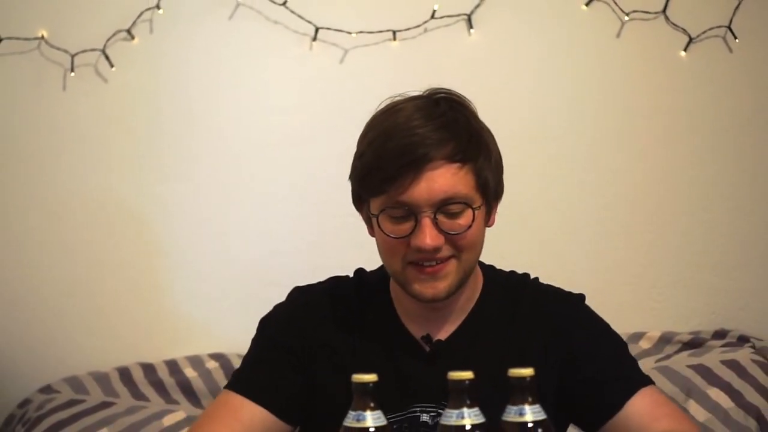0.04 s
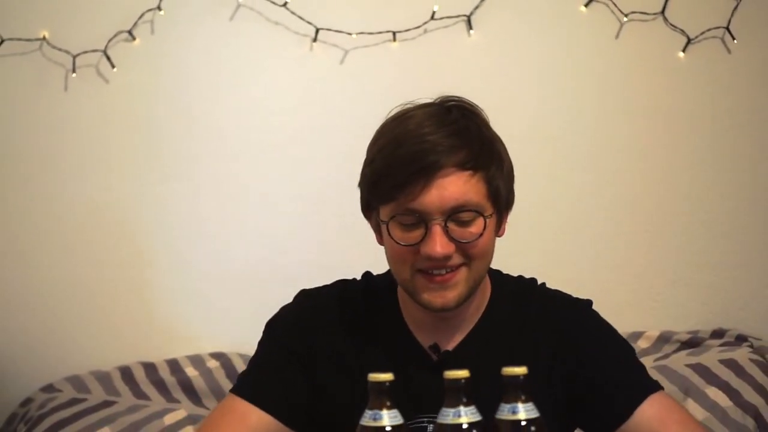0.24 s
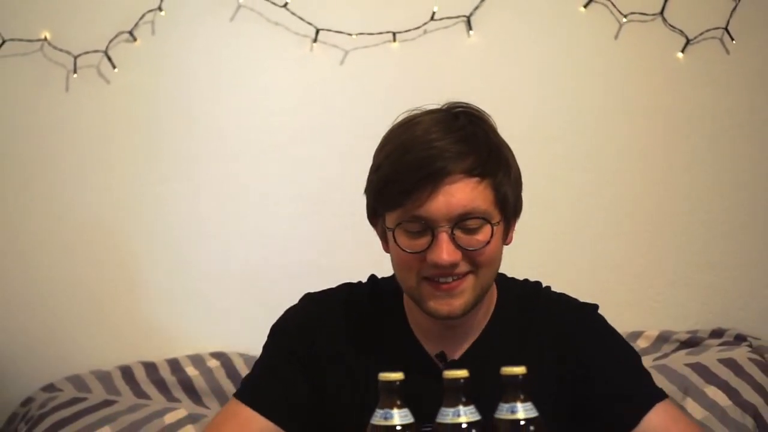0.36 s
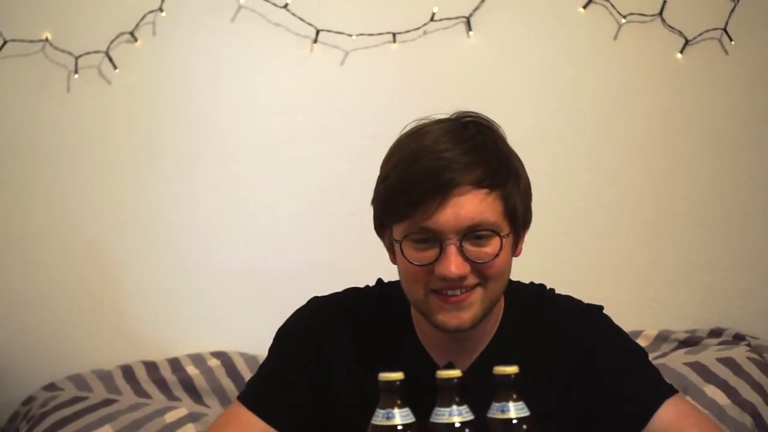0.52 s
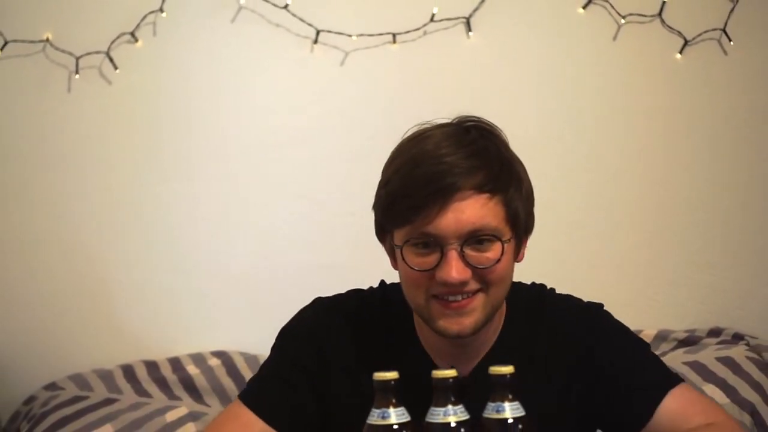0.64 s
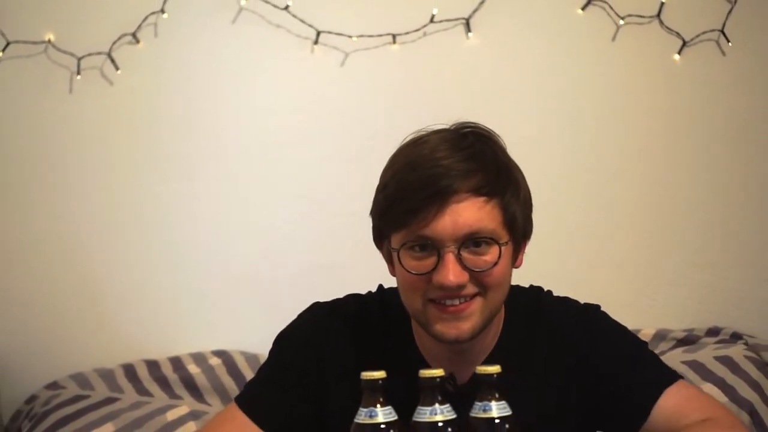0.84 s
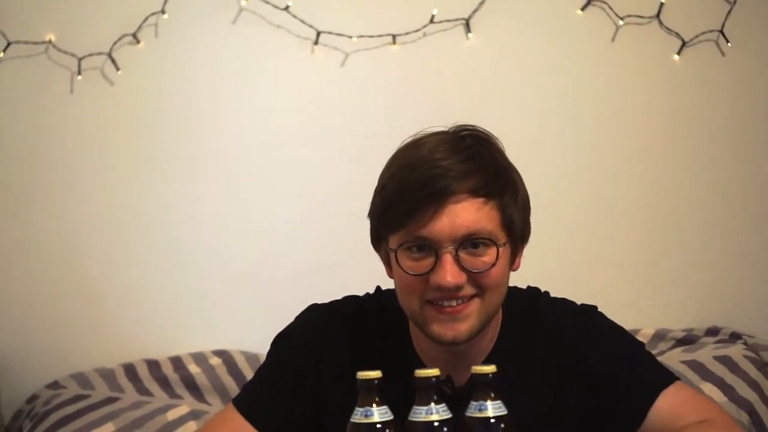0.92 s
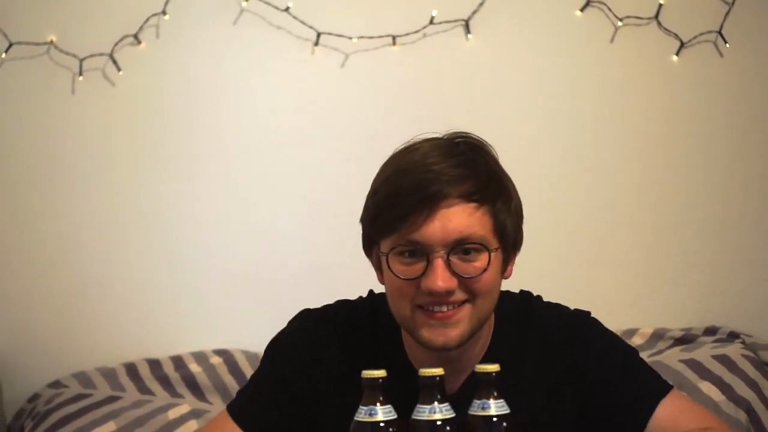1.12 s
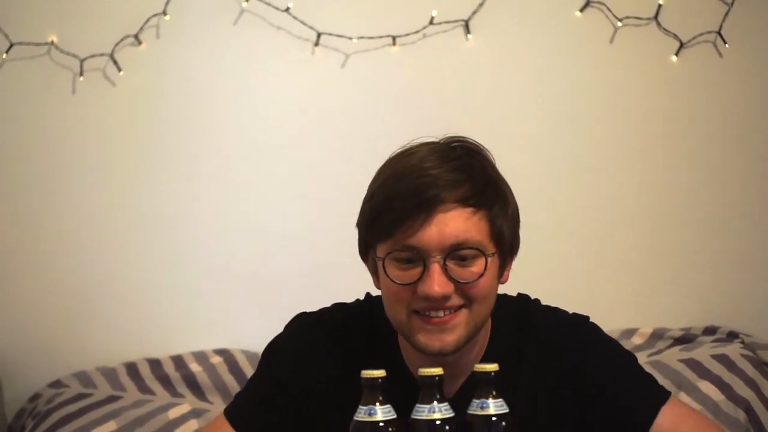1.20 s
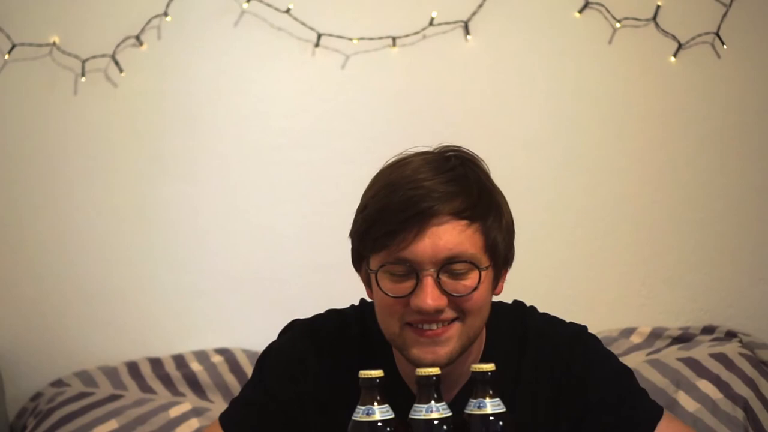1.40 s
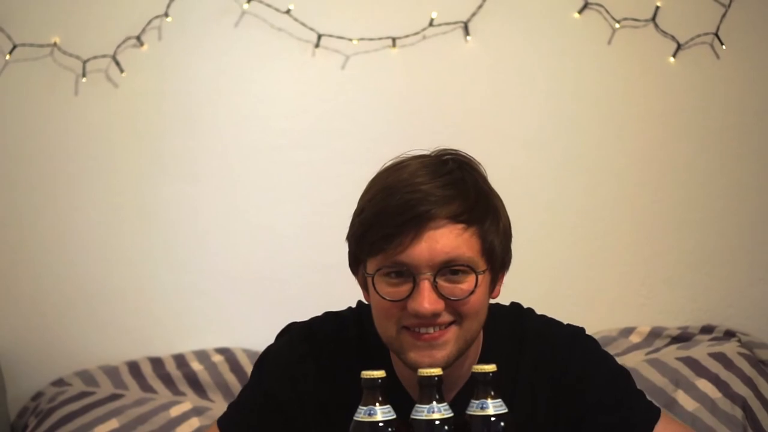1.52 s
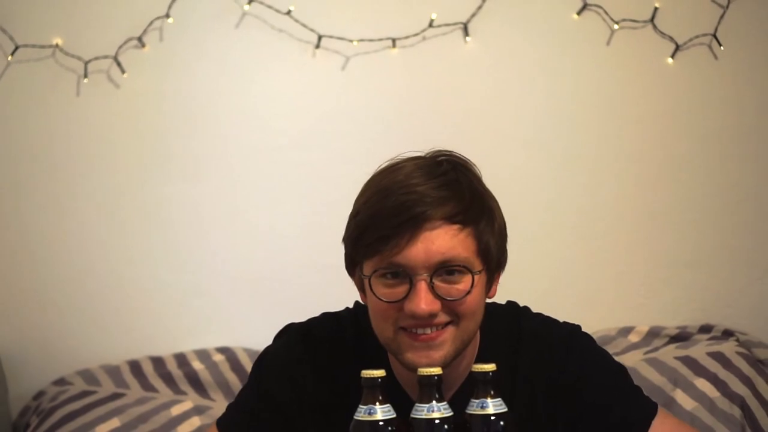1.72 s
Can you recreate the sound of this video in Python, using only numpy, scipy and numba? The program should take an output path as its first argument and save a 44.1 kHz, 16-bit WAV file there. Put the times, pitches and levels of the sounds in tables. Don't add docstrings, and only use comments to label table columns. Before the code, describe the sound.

Close up indoors, glass bottles are pushed together on a wooden table, scraping first, then ringing and chattering twice with a tiny liquid glug between, followed by near silence and small dull bumps.

```python
import sys
import numpy as np
from scipy import signal
from scipy.fft import rfft, irfft
from scipy.io import wavfile
from scipy.ndimage import uniform_filter1d
from numba import njit

SR = 44100
rng = np.random.default_rng(int(sys.argv[2]) if len(sys.argv) > 2 else 0)


def undo_db(level):
    steps = np.asarray(level, float) / 20
    return 10 ** steps


def file_out(sig):
    cols = np.atleast_2d(sig).T
    lim = np.clip(cols, -1, 1)
    pcm = np.round(lim * 32767).astype(np.int16)
    wavfile.write(sys.argv[1], SR, pcm)


N = 77175


def curve(table, column):
    points = np.array(table, float)
    return np.interp(np.arange(N) / SR, points[:, 0], points[:, column])


def colour(x, points, peaks=()):
    hz = np.arange(N // 2 + 1) * SR / N + 1
    points = np.array(points, float)
    gain = undo_db(np.interp(np.log(hz), np.log(points[:, 0] + 1), points[:, 1]))
    for centre_hz, width_hz, db in peaks:
        gain = gain * (1 + (undo_db(db) - 1) / (1 + (2 * (hz - centre_hz) / width_hz) ** 2))
    return irfft(rfft(x) * gain, N)


def unit(x):
    return x / np.sqrt(np.mean(x ** 2))


def walk(rate_hz):
    hold = int(SR / rate_hz)
    steps = np.repeat(rng.standard_normal(N // hold + 1), hold)
    return 1.68 * uniform_filter1d(uniform_filter1d(steps, hold), hold)[:N]


def grit(spread_db):
    return rng.standard_normal(N) * undo_db(-spread_db * np.log(rng.random(N)))


def tone(hz):
    return np.exp(2j * np.pi * np.cumsum(hz + np.zeros(N)) / SR)


@njit
def ring(x, fall, rise):
    y, swing, heard = np.empty_like(x), 0j, 0j
    for i in range(len(x)):
        swing = swing * (1 - fall[i]) + x[i] + 1e-18
        heard = heard * (1 - rise) + rise * swing
        y[i] = heard
    return y


def hum(hz, width_hz):
    push = grit(1.9) + 1j * grit(2.3)
    fall = np.full(N, np.pi * width_hz / SR)
    return unit(np.imag(tone(hz) * ring(push, fall, 2 * np.pi * width_hz / SR)))


# t/s, wood rumble level/dB, hiss level/dB, leg thrum level/dB, table boom level/dB, scrape f/Hz
SLIDING_EFFORT = [(0, -37, -48.5, -54, -44, 600), (.17, -37, -57, -49.5, -43.5, 613.1),
                  (.3, -30, -47.5, -39.5, -44.5, 718.4), (.44, -42.5, -65.5, -53, -57, 700),
                  (.49, -38, -55.5, -49, -50.5, 620), (.66, -36, -46.5, -50, -40, 560),
                  (.75, -49, -64.5, -63, -71, 502.1), (.8, -43, -61, -60, -59.5, 600),
                  (.935, -44.5, -61, -55, -61.5, 540), (1.04, -72.5, -85.5, -67, -78, 520),
                  (1.18, -75.5, -87.5, -70.5, -79.5, 521.7), (1.2, -69, -71.5, -65.5, -73.5, 535.6),
                  (1.28, -65.5, -78, -58.5, -71.5, 479), (1.38, -74.5, -84, -71, -82, 517.3),
                  (1.46, -69, -88, -74, -76, 601.6), (1.545, -55.5, -72.5, -67.5, -68, 627.2),
                  (1.6, -64.5, -83, -72, -83, 683), (1.72, -80, -93, -78.5, -88, 652.7)]
# t/s, scrape over rumble level/dB
BITE = [
    (0, 6.5),
    (.17, -0.5),
    (.22, -8.5),
    (.36, -2.5),
    (.45, -5.5),
    (.5, 6),
    (.55, -8.5),
    (.8, -3.5),
    (1.1, -2),
    (1.5, 0.5),
]
# f/Hz, level/dB
WOOD_COLOUR = [(60, -22), (140, -22), (300, -9.5), (450, -11), (900, -11), (1400, -18), (2300, -24.5),
               (3500, -37)]
# f/Hz, width/Hz, level/dB
TABLE_RESONANCE = [(1840, 300, 3)]
# f/Hz, level/dB
HISS_COLOUR = [(1180, -30.5), (2000, -7.5), (3610, -14), (4380, -5.5), (6090, 0), (8190, -3), (11600, -4),
               (14700, -20), (16000, -35)]


def slide():
    rumble = 0
    for hz in 78 * 2. ** np.arange(6):
        octave = [(hz / 4, -40), (hz / 1.3, 0), (hz * 1.6, 0), (hz * 4, -40)]
        grains = colour(grit(2.3), WOOD_COLOUR, TABLE_RESONANCE)
        rumble = rumble + colour(grains, octave) * undo_db(2.8 * walk(60))
    scrape = hum(curve(SLIDING_EFFORT, 5), width_hz=180)
    wood = unit(rumble) + undo_db(curve(BITE, 1) + 1.6 * walk(25)) * scrape
    boom = hum(219, width_hz=40) * undo_db(curve(SLIDING_EFFORT, 4))
    hiss = colour(grit(0.92), HISS_COLOUR) * undo_db(0.68 * walk(45))
    wood = unit(wood) * undo_db(curve(SLIDING_EFFORT, 1))
    return wood + boom + unit(hiss) * undo_db(curve(SLIDING_EFFORT, 2) + 9.5)


# f/Hz, level/dB
LEG_COLOUR = [(15, -32.5), (25, -7.5), (43, 3.5), (151, -7.5), (170, -6), (220, -36), (370, -120)]


def leg_thrum():
    flutter_db = 3 * walk(12)
    return unit(colour(rng.standard_normal(N), LEG_COLOUR)) * undo_db(curve(SLIDING_EFFORT, 3) + flutter_db)


# lower f/Hz, upper f/Hz
SHOULDER_HZ = (5300, 6200)
# f/Hz, share of the rise
PRESSED = [(5750, 1), (5789, 1), (6840, .3), (6846, .3)]


def strike(modes, at, size, tilt_db, shoulder_db, swing, damp, rise_s, press=0):
    out = 0
    spot = rng.standard_normal((len(at), len(modes), 2))
    for k, (hz, db, t60) in enumerate(modes):
        family_db = shoulder_db * (SHOULDER_HZ[0] < hz < SHOULDER_HZ[1])
        spot_db = 2 * spot[:, k, 0]
        gain = size * undo_db(db + spot_db + tilt_db * np.log2(hz / 6000) + family_db)
        blows = np.zeros(N, complex)
        np.add.at(blows, at, gain * np.exp(1j * swing * hz / 6000 * spot[:, k, 1]))
        pitch = tone(hz * (1 + dict(PRESSED).get(hz, 0) * press / 100))
        fall = np.log(1000) * damp / (max(t60, .002) * SR)
        out = out + np.imag(pitch * ring(blows, fall, min(2 / (rise_s * SR), 1.)))
    return out


# t/s, peak level/dB, f/Hz, click level/dB, t60/s
KNOCKS = [(0.2, -25, 757, -10.5, 0.0084), (0.5415, -18.5, 680, -8.5, 0.012), (.637, -41, 480, -12, .02),
          (.7, -34, 990, -30, 0.079), (.997, -50.5, 531, -21, 0.045), (1.054, -58, 474, -19, 0.034),
          (1.091, -43, 643, -29, 0.03), (1.121, -71, 700, 2, .02), (1.128, -57, 552, -11, 0.024),
          (1.194, -55, 571, -21, .03), (1.219, -64, 330, 4, 0.022), (1.24, -68, 500, 1, 0.023),
          (1.259, -47.5, 256, -28, 0.028), (1.469, -40, 679, -15.5, 0.0086),
          (1.505, -56.5, 600, -10, 0.016), (1.532, -42, 690, -13.5, 0.019), (1.551, -49, 600, -9, 0.025),
          (1.564, -49.5, 650, -8.5, .012), (1.606, -50.5, 719, -10, 0.018)]


def knocks():
    out = 0
    click_t60 = .012
    for s, db, hz, click_db, t60 in KNOCKS:
        body = [(hz, 0, t60), (hz * 1.7, -10, .008), (hz / 2, -11, .012)]
        click = [(1650, click_db, click_t60), (1250, click_db - 1.5, click_t60)]
        out = out + strike(body + click, np.array([int(s * SR)]), undo_db([db]), 0, 0, 0, np.ones(N), 0.0011)
    return out


def wall_modes(pitches, walls, shift_db=0):
    return [(hz, db + shift_db, t60) for hz, (db, t60) in zip(pitches, walls)]


MIDDLE_HZ = [4748, 5654, 6620, 6756, 9642, 11070, 13200]
# level/dB, t60/s
MIDDLE_WALL = [(-15, 0.42), (-13.5, 0.6), (-13.5, .11), (-9.5, 0.23), (-10.5, 0.18), (-21.5, 0.35),
               (-25.5, 0.14)]
# f/Hz, level/dB, t60/s
CRACK = [(700, -16.5, 0.011), (1453, -3.5, 0.0061), (1901, -1.5, 0.0082), (4630, -12, 0.0077),
         (5630, 0.5, .012), (6730, -3, 0.017), (8090, -17, 0.018), (9590, -12.5, 0.022),
         (10650, -11, 0.0098), (12580, -19.5, .02)]


def pair(own, taps, rub, middle_db):
    taps = np.array(taps)
    damp = np.clip(curve(rub, 2), .3, 8)
    luck = rng.random((N // 100, 2))
    tick_s = rub[0][0] + np.cumsum(-np.log(luck[:, 0])) / 900
    ticks = (tick_s * SR).astype(int).clip(0, N - 1)
    tick = undo_db(curve(rub, 1)[ticks] - 1.3 * np.log(luck[:, 1])) * (ticks < rub[-1][0] * SR)

    at = np.r_[(taps[:, 0] * SR).astype(int), ticks]
    bounce = undo_db(taps[:, 1])
    tilt_db = np.r_[taps[:, 2], -1 + 0 * tick]
    shoulder_db = np.r_[taps[:, 3], 0 * tick]
    swing = np.r_[1 + 0 * bounce, 20 + 0 * tick]

    modes = own + wall_modes(MIDDLE_HZ, MIDDLE_WALL, middle_db)
    glass = strike(modes, at, np.r_[bounce, tick], tilt_db, shoulder_db, swing, damp,
                   rise_s=0.0025, press=curve(rub, 3))
    crowd = [(hz * (1 + 0.038 * u), db - 4.0, t60) for hz, db, t60 in CRACK for u in (-1.3, 0, 1)]
    crack = strike(crowd, at, np.r_[bounce, tick * undo_db(-2)], np.maximum(tilt_db, 0), shoulder_db,
                   swing + 20, np.ones(N), rise_s=0.00092)
    return undo_db(-15.5) * (glass + crack)


LEFT_HZ = [2429, 4570, 5513, 5750, 6595, 6840, 8129, 8258, 9092, 9528, 9900, 10418, 12748]
# level/dB, t60/s
LEFT_WALL = [(-8, 0.46), (-16, 0.15), (-8.5, .18), (-10.5, 0.32), (-4.5, 0.13), (-15, 0.44), (-28, 0.046),
             (-19.5, 0.061), (-27, .2), (-19.5, 0.24), (-19.5, 0.43), (-20, 0.22), (-27, 0.39)]
# t/s, level/dB, tilt/(dB per octave), shoulder modes level/dB
LEFT_TAPS = [(0.2022, 1.5, -2, -16), (0.2277, -1.5, -7, 0.5), (0.247, -10, -4.5, -1),
             (0.2724, -2.5, 1, -1.5), (.2825, -5.5, 1.5, 2), (0.29, -9, -2.5, 0.5), (.299, -8, -1, 1.5),
             (0.311, -11.5, -3.5, -1), (0.316, -11.5, 3, 1), (.33, -18, -0.5, 0.5), (0.34, -17.5, 3.5, 0.5),
             (0.356, -16.5, 0, 1.5), (0.37, -22, 2, -0.5), (0.397, -18, -7.5, -9.5), (1.063, -57, 4, -14),
             (1.386, -54, 6.5, 5)]
# t/s, chatter level/dB, extra damping factor, rise of pressed modes/%
LEFT_RUB = [
    (.202, -43, 1.8, -.1),
    (.21, -25.5, 1.17, -0.12),
    (.3, -23, 2.2, -0.12),
    (0.349, -24, 1.424, 0.41),
    (.391, -31.5, 6, 0.9),
    (.4, -43.5, 1.7, .7),
    (.48, -59.5, 2.4, .7),
]


def left_meets_middle():
    return pair(wall_modes(LEFT_HZ, LEFT_WALL), LEFT_TAPS, LEFT_RUB, middle_db=-1)


def bubble():
    start_s, length_s, low_hz, high_hz = .374, .03, 690, 1000
    u = np.clip((np.arange(N) / SR - start_s) / length_s, 0, 1)
    hz = low_hz + (high_hz - low_hz) * u ** 2
    swell = np.sqrt(np.abs(np.sin(np.pi * u)))
    return undo_db(-32) * swell * np.sin(2 * np.pi * np.cumsum(hz) / SR)


RIGHT_HZ = [2385, 2520, 4877, 5120, 5480, 5789, 6138, 6745, 6846, 7020, 8100, 10516, 10971, 12812]
# level/dB, t60/s
RIGHT_WALL = [(-1.5, 0.046), (-17.5, 0.46), (-6.5, 0.16), (-24.5, 0.24), (-15.5, .1), (-0.5, 0.091),
              (-18, .15), (-3, 0.19), (-3, 0.12), (-17.5, 0.093), (-24, 0.14), (-14, 0.25), (-15.5, 0.17),
              (-24.5, 0.24)]
# t/s, level/dB, tilt/(dB per octave), shoulder modes level/dB
RIGHT_TAPS = [(.5434, 3, 3.5, -1), (.558, -2, -2.5, -0.5), (.5685, 0, 4.5, 1), (.582, 0.5, 5, 5),
              (.589, -2, 9.5, 0), (.596, -2, 0.5, 0.5), (.603, -11.5, 1, 0), (.6115, -4.5, 4, 0.5),
              (.618, -5.5, 2.5, -1.5), (.626, -2.5, 4, 1), (.633, -10, -3, 0.5), (.64, -6, 6, 2),
              (.648, -7.5, 2, 1.5), (.655, -9.5, 6, -0.5), (.662, -10, 7, -3.5), (.674, -10, 4.5, 5),
              (.685, -16.5, -1, 7.5), (.699, -19, -10, -5), (.735, -31.5, -10.5, -5), (1.055, -59, 8, 2),
              (1.083, -54.5, 8, 0), (1.11, -54, 11, -1), (1.122, -56.5, 12.5, -4), (1.145, -67, 8, 0),
              (1.1933, -43, 9, 1), (1.219, -67, 7, -4), (1.238, -62, 4, -4)]
# t/s, chatter level/dB, extra damping factor, rise of pressed modes/%
RIGHT_RUB = [
    (0.544, -26.5, 4.4, -1.4),
    (0.551, -19, 2.7, -1.3),
    (0.591, -17.5, 2.55, -0.11),
    (.64, -15, 3.05, 0.25),
    (.68, -21, 3.3, 1.05),
    (.7, -25.5, 7.1, 1.63),
    (0.732, -40.5, 2.4, 1.8),
    (0.819, -76, 1.3, 1.3),
]


def right_meets_middle():
    return pair(wall_modes(RIGHT_HZ, RIGHT_WALL), RIGHT_TAPS, RIGHT_RUB, middle_db=-3.5)


# f/Hz, side minus mid level/dB
PORTS = [(60, -47.5), (110, -53.5), (200, -62), (380, -52.5), (700, -51), (1290, -46.5), (2380, -22),
         (4400, -15.5), (8120, -9.5), (15000, -4)]


def two_ports(mid):
    scatter = rng.standard_normal((4, 800)) * np.exp(-np.arange(800) / (.004 * SR))
    side = 0
    for echo in scatter:
        side = side + walk(65) * signal.fftconvolve(mid, echo / np.linalg.norm(echo))[:N]
    side = colour(side * undo_db(-9.0), PORTS)
    return np.array([mid + side, mid - side])


# f/Hz, level/dB
MIC = [(120, 5), (2650, 0.5), (3300, 5), (4000, -0.5), (4400, 4.5), (13500, 0), (16000, -8.5)]


def scene():
    glass = colour(left_meets_middle() + right_meets_middle(), MIC)
    return two_ports(slide() + leg_thrum() + knocks() + glass + bubble())


def band_limit(x):
    return signal.sosfilt(signal.butter(12, 16460, fs=SR, output="sos"), x)


def record(dry):
    return band_limit(dry)


dry = scene()
out = record(dry)
file_out(out)
```